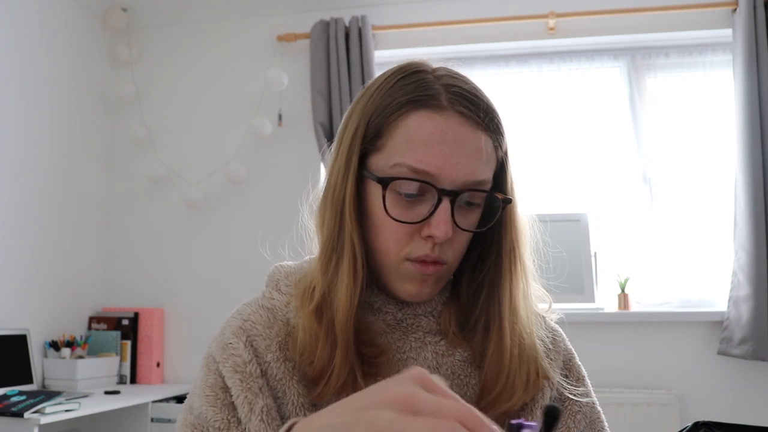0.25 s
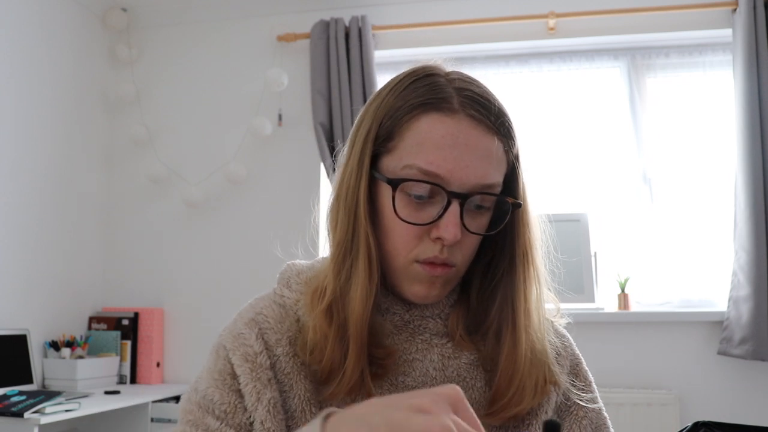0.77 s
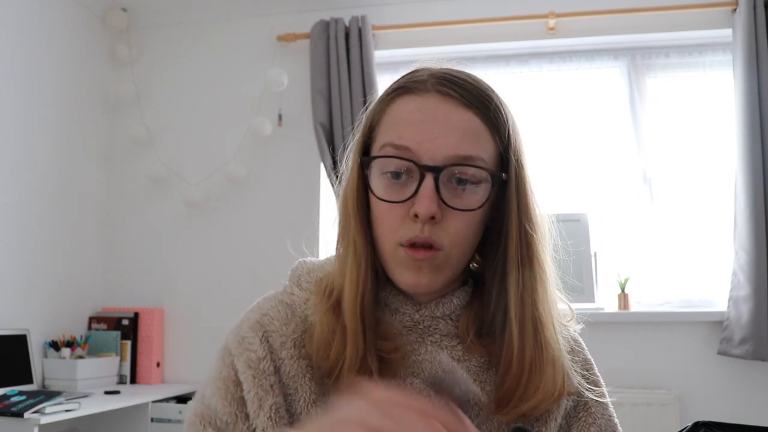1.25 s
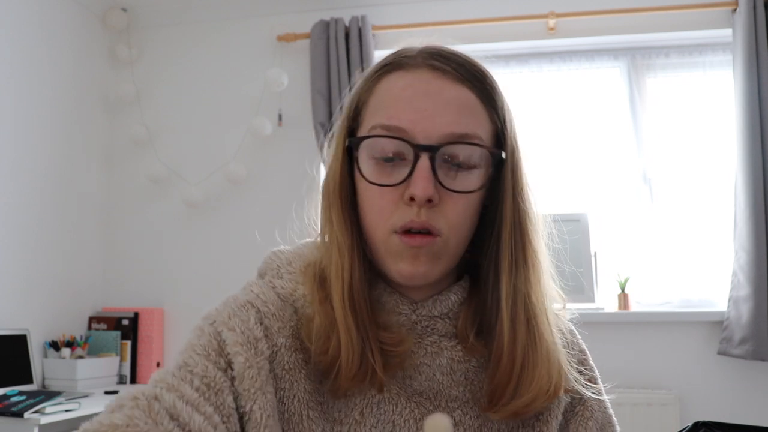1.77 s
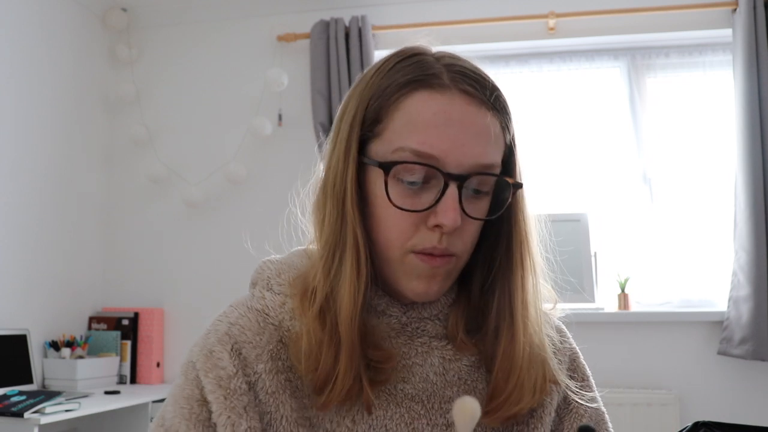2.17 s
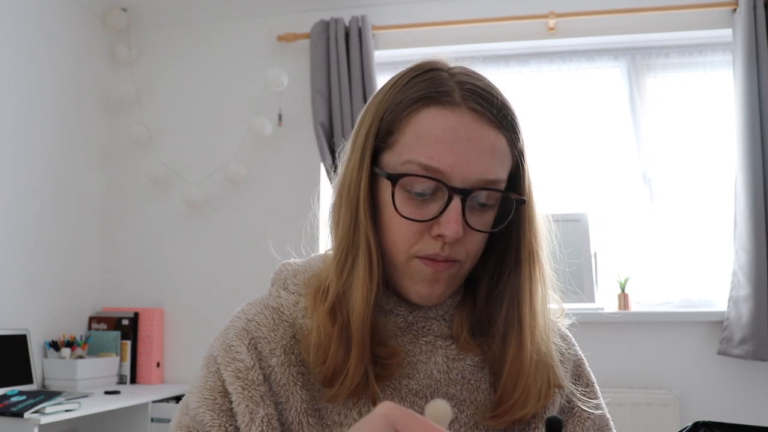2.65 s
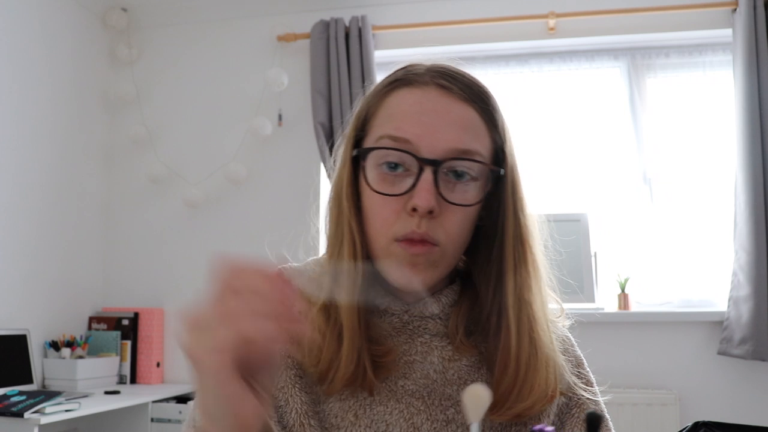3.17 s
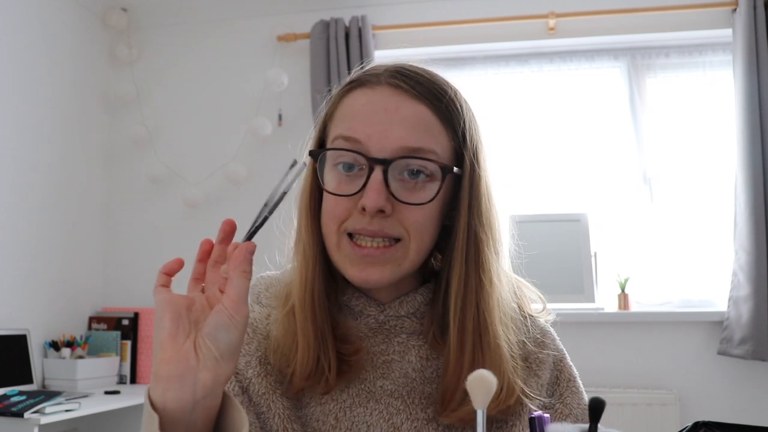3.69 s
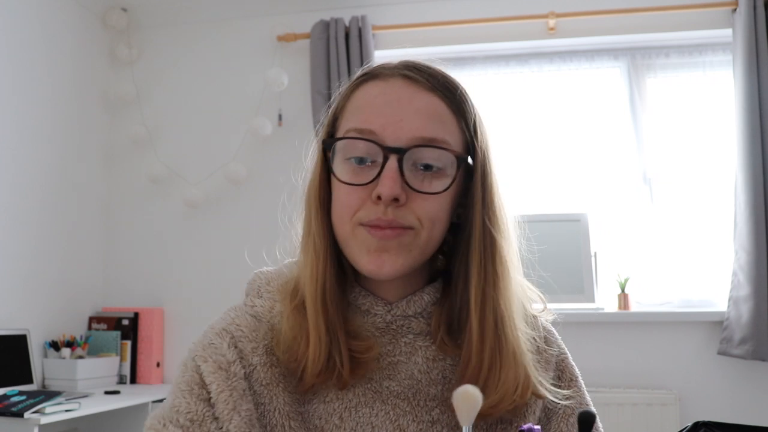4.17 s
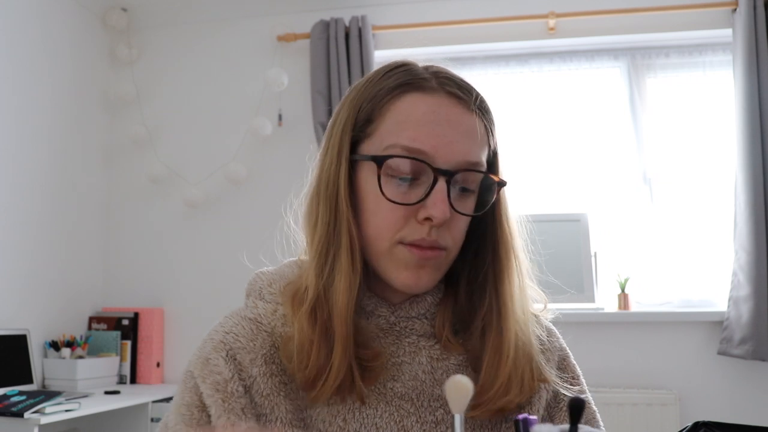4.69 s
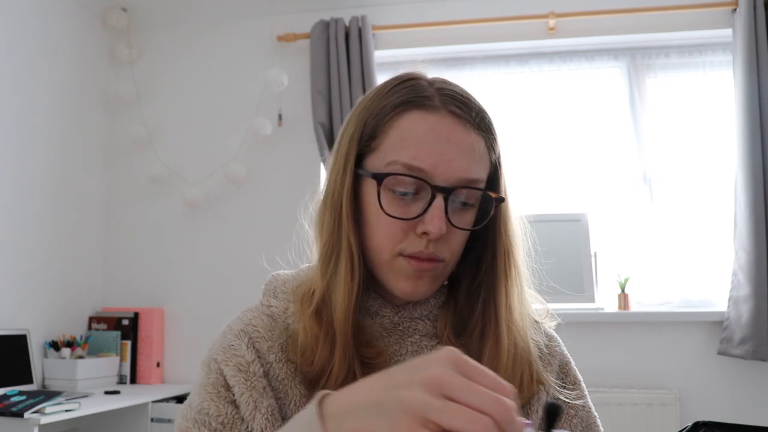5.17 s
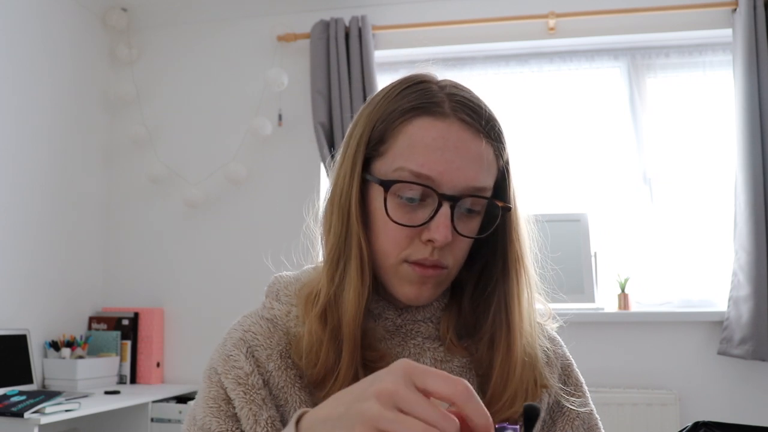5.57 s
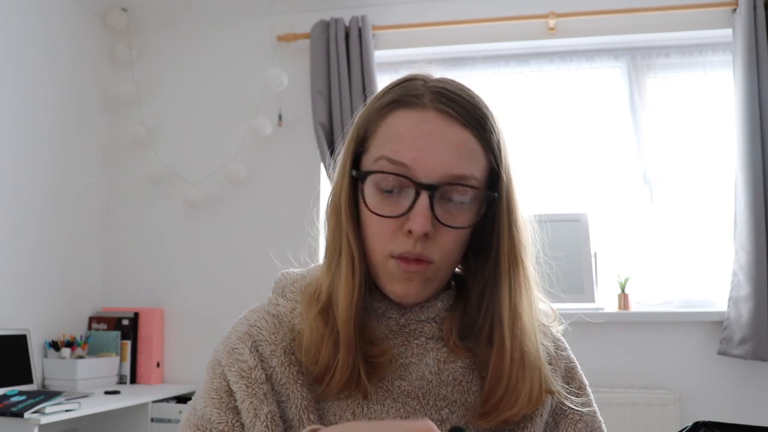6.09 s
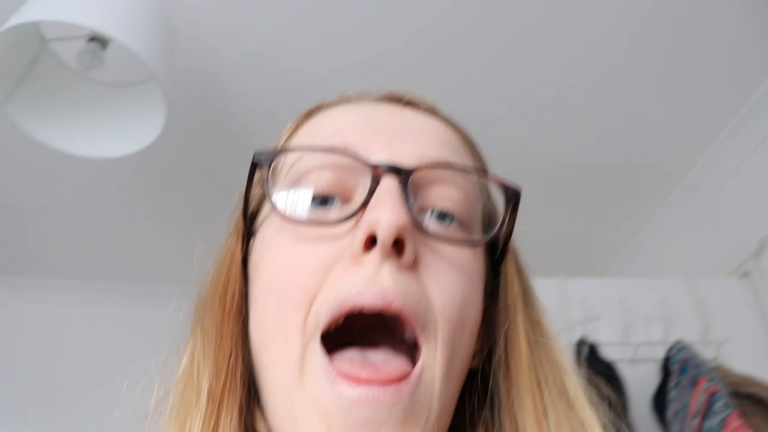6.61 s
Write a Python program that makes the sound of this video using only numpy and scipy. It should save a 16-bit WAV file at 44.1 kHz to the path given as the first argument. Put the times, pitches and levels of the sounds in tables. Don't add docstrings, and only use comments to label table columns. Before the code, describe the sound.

A quiet bedroom with short soft echo and steady low hiss, heard by a stereo camera microphone close to the objects. From 0 to 1.1 s fingers search a pot of small plastic and glass tubes: irregular bright clicks, hollow knocks and light rubbing, strongest near 0.26 and 0.5 s. At 1.2 s a tube falls in, lands hard and bounces in a rapid fading rattle until 1.5 s. From 1.84 to 2.5 s tubes drop on the desk at left with sharp cracks, woody knocks and scraping. From 2.6 to 3.2 s sparse clicks and a faint rim drag; at 3.3-3.6 s tiny creaks and taps close by. At 4.42 s steel tweezers strike the left desk, skid, chatter and ring thinly to about 5 s. Searching resumes at 5.2 s, busiest from 6.0 to 6.45 s. At 6.65 s a finger thumps the camera, then skin brushes it.

```python
import sys
import numpy as np
from scipy import signal
from scipy.fft import rfft, irfft, next_fast_len
from scipy.io import wavfile
from scipy.ndimage import map_coordinates

SR = 44100
rng = np.random.default_rng(int(sys.argv[2]) if len(sys.argv) > 2 else 0)


def elevation(decibels):
    levels = np.asarray(decibels, float)
    return 10 ** (levels / 20)


def store_wav(level_fs):
    pcm = np.round(np.clip(np.atleast_2d(level_fs), -1, 1) * 32767)
    wavfile.write(sys.argv[1], SR, pcm.T.astype(np.int16))


N = 302085
LENGTH = 4096
SIDES = np.array([[.5], [-.5]])  # left, right share of a pan in dB

# centre_hz, width_hz, level_db
TUBES = [(1970, 310, -1), (2930, 150, -28.5), (3520, 92, 4), (5210, 73, 5.5), (5520, 390, 6),
         (7250, 83, -11)]
# centre_hz, width_hz, level_db
POT = [(470, 106, 5), (599, 22, 16.5), (845, 217, 3.5), (1026, 96, 14.5), (1140, 14, -22.5)]
# centre_hz, width_hz, level_db
DESK = [(148, 21, -0.5), (195, 7, 10.5), (274.7, 25, 7), (346, 24, 1.5), (600, 35, -4), (760, 82, 3),
        (1241, 50, 5)]


def unit(x):
    return x / np.sqrt(np.mean(x ** 2) + 1e-20)


def along(points, hz):
    f, v = np.transpose(points)
    return np.interp(np.log(hz + 1), np.log(f + 1), v)


def filtered(x, response):
    m = next_fast_len(N + 8192)
    return irfft(rfft(x, m) * response(np.fft.rfftfreq(m, 1 / SR)), m)[..., :N]


def mode(f, hz, width):
    return 1j * f * width / (hz * hz - f * f + 1j * f * width)


def body(f, peaks):
    return sum((-1) ** k * elevation(db) * mode(f, hz, abs(w) + 5) for k, (hz, w, db) in enumerate(peaks))


def contacts(rows, hollow, broad, crack_s, sharpness, bright_db, shell=TUBES, rise_s=0.0021, punch=2.52):
    s, db, knock_db, edge_db, hz, knock_hz = np.transpose(rows)[:, :, None]
    t, f = np.arange(LENGTH) / SR, np.fft.rfftfreq(LENGTH, 1 / SR)
    shape = (len(s), LENGTH)
    crack = rng.standard_normal(shape) * elevation(-60 * t / min(crack_s, .016)) * (1 - np.exp(-t / rise_s))
    push = rfft(crack) + punch * np.exp(-2j * np.pi * f * 0.0006)
    snap = rfft(rng.standard_normal(shape) * elevation(-60 * t / 0.0071))
    clean_push = push + 22 * np.exp(-2j * np.pi * f * 0.00044)

    ring = mode(f, hz, hz / np.clip(sharpness, 2, 9))
    walls = broad + 0.5 * body(f, shell) + 1.5 * ring
    walls = walls * mode(f, 4000, 11900) ** 2 / (1 + 1j * f / 8000) ** 2
    knock = 0.42 * body(f, hollow) + mode(f, knock_hz, knock_hz / 3.2)
    knock = knock * mode(f, knock_hz, 1.4 * knock_hz)
    edge = mode(f, 8300, 5000) ** 2 * mode(f, 8000, 7000)

    parts = [irfft(p) for p in (push * walls, clean_push * knock, snap * edge)]
    gains_db = (db, db + knock_db + 3.5, db + edge_db + bright_db)
    sound = sum(elevation(g) * p / abs(p).max(axis=1, keepdims=True) for g, p in zip(gains_db, parts))
    buses = np.zeros((4, N + LENGTH))
    for k, row in enumerate(sound):
        buses[k % 4, round(s[k, 0] * SR):][:LENGTH] += row
    return buses[:, :N]


def clicks(rows, knock_db, knock_hz):
    return [(s, db, knock_db, edge_db, hz, knock_hz) for s, db, edge_db, hz in rows]


def knocks(rows, edge_db, ring_hz):
    return [(s, db, knock_db, edge_db, ring_hz, hz) for s, db, knock_db, hz in rows]


def rings(rows):
    rise_s = .001
    out, t = np.zeros(N + 2 * LENGTH), np.arange(2 * LENGTH) / SR
    for s, db, hz, t60 in rows:
        tone = np.sin(2 * np.pi * hz * t) * (1 - np.exp(-t / rise_s))
        out[round(s * SR):][:len(t)] += elevation(db - 60 * t / t60) * tone
    return out[:N]


def picking():
    # start_s, peak_db, edge_db, ring_hz
    tube_clicks = [(0.03, -16.5, -37.5, 2370), (0.175, -12, -10.5, 3360), (0.1835, -16, -15, 5100),
                   (0.2313, -15.5, -12.5, 3640), (0.2584, -5, -22.5, 3700), (0.2837, -8, -13.5, 3760),
                   (0.3342, -10.5, -15.5, 4160), (0.4274, -24, -14.5, 3600), (0.436, -29, -18, 2700),
                   (0.4444, -16, -11, 3630), (0.5102, -1, -27, 5550), (0.5543, -17.5, -13, 3300),
                   (0.6064, -30, -27, 1920), (0.7821, -32, -25, 5600), (0.9418, -19.5, -39, 5550),
                   (0.9664, -20, -37, 3540), (0.9826, -39, 7.5, 3500), (0.9945, -33.5, -0.5, 3520),
                   (1.0054, -13, -41, 5300), (1.1273, -21, -14.5, 6940),
                   (2.6166, -13, -6, 3740),
        (2.633, -5.5, -44, 4900),
        (2.6351, -15, -45.5, 3660),
        (2.6575, -11, -21.5, 4900),
        (2.9942, -20, -20.5, 3400),
        (3.1414, -11, -11, 3480),
        (4.164, -35.5, -41, 2900),
                   (5.246, -36.5, -12, 4300), (5.2969, -18, -8.5, 3720), (5.301, -10, -49.5, 3640),
                   (5.332, -18, -6, 3400), (5.731, -39.5, -26, 3430), (5.8036, -37.5, -27.5, 3570),
                   (6.002, -17, -25.5, 4500), (6.0504, -1, -13.5, 4100), (6.1564, -28.5, -10, 3300),
                   (6.2031, -18, -26.5, 4060), (6.25, -19, -31.5, 3760), (6.2842, -16.5, -23, 3520),
                   (6.253, -16.5, -28, 5640), (6.292, -21, -23.5, 4240), (6.322, -16.5, -23, 3670),
                   (6.3298, -5.5, -13, 4620), (6.3381, -11.5, -57.5, 4330), (6.4407, -19.5, -14.5, 3380)]
    # start_s, peak_db, knock_db, knock_hz
    pot_knocks = [(0.0024, -45, 17.5, 875), (0.0114, -8.5, -13, 850), (0.155, -23.5, -19.5, 660),
                  (0.4783, -24.5, -22, 500), (0.63, -26.5, -13, 1630), (0.6756, -21, -6.5, 1050),
                  (0.6886, -48.5, 21.5, 1130), (0.7094, -27.5, -3.5, 1110), (0.7467, -34, -15, 625),
                  (0.8843, -15, -20, 414), (0.895, -23, -29, 680), (1.0164, -22, -19, 1070),
                  (1.0434, -30.5, 1, 960), (1.0776, -16, -16.5, 570),
                  (2.566, -38.5, -11, 505), (2.7622, -24, -39, 457), (2.811, -22, -44, 476),
                   (2.863, -24, -20, 463), (3.1464, -11, -34, 700), (3.76, -50.5, 8, 1200),
                   (3.7755, -42.5, 6.5, 1790), (4.125, -62.5, 7, 219), (4.14, -61, 6, 350),
                   (4.152, -48, -2, 1300), (4.3277, -36.5, -12, 557), (5.1607, -38, -15, 1120),
                   (5.2678, -35, -5, 1120), (5.456, -30, -16, 466), (5.503, -31, -11, 1620),
                   (5.5244, -41.5, 4, 685), (5.539, -23, -24, 1096), (5.861, -39.5, -9.5, 470),
                   (5.9235, -34, -11, 880), (5.9668, -22.5, -23, 960), (5.976, -28, -8, 1210),
                   (6.0092, -29, -12, 1450)]
    picked = clicks(tube_clicks, knock_db=-29.0, knock_hz=600)
    picked += knocks(pot_knocks, edge_db=-22.5, ring_hz=3300)
    return contacts(sorted(picked), POT, broad=0.94, crack_s=0.017, sharpness=2.76, bright_db=15, punch=1.58)


def bounces(count):
    first_s, flight_s, shrink = 1.3154, .0205, .77
    first_db, loss_db, knock_db, knock_hz = -12.5, 3, -8.5, 850
    rows = []
    for k in range(count):
        at_s = first_s + flight_s * (1 - shrink ** k) / (1 - shrink)
        rows.append((at_s, first_db - loss_db * k, knock_db, knock_hz))
    return rows


def falling():
    # start_s, peak_db, knock_db, knock_hz
    fall = [
        (1.2225, -15.5, -2, 780),
        (1.228, -16, -6, 650),
        (1.2485, -20, -4.5, 900),
        (1.279, -10, -22, 900),
        (1.2364, -21, 1, 900),
        (1.252, -6.5, -15, 860),
        (1.2832, -2.5, -15, 834),
        (1.4631, -40, -8, 1190),
        (1.5194, -33, -15, 526),
        (1.7694, -41, -4.5, 446),
    ]
    rows = knocks(fall + bounces(count=8), edge_db=-22, ring_hz=3400)
    return contacts(rows, POT, broad=0.6, crack_s=0.021, sharpness=8.1, bright_db=-40.0)


def pot_rings():
    # start_s, level_db, pitch_hz, t60_s
    clear_modes = [(1.2235, -16.5, 592, 0.08), (1.2235, -24, 960, .05), (1.2235, -14, 2140, 0.022),
                   (1.2235, -13, 3400, 0.028), (1.2505, -17, 3300, 0.035), (1.2505, -22, 1600, .04),
                   (1.283, -14.5, 1482, 0.041), (1.283, -27, 3520, 0.028), (1.316, -22, 1600, 0.049),
                   (5.925, -52, 980, .03), (5.953, -33, 950, 0.023), (5.976, -24, 967, 0.028),
                   (5.976, -28, 1550, 0.039), (5.991, -35, 1480, .06), (6.005, -25, 973, 0.042),
                   (6.013, -27, 3400, .02), (6.019, -39, 1090, .05), (6.441, -34.5, 957, 0.037),
                   (.2595, -15, 4900, .03), (.284, -28, 3520, 0.045), (.287, -17, 4900, 0.037),
                  (.3345, -18, 3530, 0.039), (.34, -34.5, 2110, 0.11), (.4455, -17, 3400, 0.025),
                  (.511, -14, 5550, 0.018), (.512, -12, 3800, .02), (1.842, -21.5, 3600, .06),
                  (1.8675, -28.5, 2800, 0.18), (4.11, -50, 201, .2), (2.6157, -9, 3590, 0.037),
                  (2.6335, -11, 3490, .03), (2.6335, -9.5, 4780, 0.019), (2.657, -26, 5030, 0.031),
                  (2.995, -19.5, 3320, 0.017), (3.1417, -16, 3480, 0.033), (6.051, -27, 3846, 0.025)]
    return rings(clear_modes)


def hums():
    # start_s, end_s, level_db, pitch_hz, width_hz
    drags = [
        (2.69, 2.91, -46, 474, 32),
        (2.77, 2.93, -56, 931, 40),
    ]
    edge_s, sag_db = .015, 5
    t, out = np.arange(N) / SR, 0
    for start, end, db, hz, width_hz in drags:
        tone = unit(filtered(rng.standard_normal(N), lambda f: mode(f, hz, width_hz) ** 2))
        level = elevation(db - sag_db * (t - start) / (end - start))
        out = out + tone * level * np.clip(np.minimum(t - start, end - t) / edge_s, 0, 1)
    return out


def dropping():
    # start_s, peak_db, edge_db, ring_hz
    sharp = [(1.8418, -13, -20, 3560), (1.846, -19, -18, 3580), (1.8566, -12, -18, 3550),
             (1.8672, -9, -18, 3480), (1.879, -13, -20, 3600), (1.917, -11, -7, 5440),
             (1.922, 2.5, 14, 8450), (1.926, -3.5, 0, 8340), (1.9505, -19.5, -11, 4600),
             (2.084, -11.5, -4, 5200), (2.0915, -13.5, -10.5, 5200), (2.11, -27.5, -13, 5500),
             (2.4415, -2, 4, 7040)]
    # start_s, peak_db, knock_db, knock_hz
    dull = [(1.949, -12, -19, 600), (1.9727, 5.5, -17.5, 670), (2.0648, -5, -11, 606),
            (2.0725, -16, 1, 720), (1.926, -16, -7, 600), (1.959, -24.5, 7, 670), (2.123, -32.5, 3.5, 300),
            (2.0843, -19.5, -12, 310), (2.0914, -18, -29, 450), (2.1094, -33, 1, 620),
            (2.1594, -33.5, -11, 273), (2.2227, -34.5, 3.5, 530), (2.296, -46, 8, 560),
            (2.3305, -37.5, -0.5, 510), (2.4484, -29.5, 6.5, 670), (2.462, -22, -12, 1230)]
    # centre_hz, width_hz, level_db
    lying = [(2030, 420, -2.5), (3480, 180, -28.5), (4900, 170, 1), (5600, 660, -15), (8300, 500, 9)]
    rows = clicks(sharp, knock_db=-37, knock_hz=700) + knocks(dull, edge_db=2.5, ring_hz=4920)
    return contacts(sorted(rows), DESK, broad=0.62, crack_s=0.0087, sharpness=10, bright_db=-16.5,
                    shell=lying, rise_s=0.00055)


def tossing():
    # start_s, peak_db, edge_db, ring_hz
    blows = [
        (4.4227, -2.5, -22, 5680),
        (4.4625, 8.5, -17.5, 2230),
        (4.508, -10.5, 1, 3380),
        (4.5324, -2, -13, 6090),
        (4.6465, -1.5, -20, 3920),
    ]
    # start_s, peak_db, knock_db, knock_hz
    thuds = [(4.4245, -17.5, -1, 700), (4.4655, -24, 0, 600), (4.5155, -41, -2.5, 600),
             (4.5473, -41, 3, 1290), (4.569, -21, 3, 600), (4.6127, -45, 14, 810), (4.638, -39, 9, 600),
             (4.6977, -23, 1, 900), (4.7237, -31, 9.5, 1020), (4.7406, -25, 2, 600),
             (4.7674, -24.5, 6, 760), (4.777, -38.5, 12.5, 600), (4.7895, -26.5, 3, 1270)]
    # start_s, peak_db, ring_hz
    chatter = [(4.4418, -12.5, 6000), (4.4964, -20.5, 5500), (4.5151, -10.5, 2480), (4.5455, -16.5, 4500),
               (4.5645, -14, 4300), (4.5685, -9.5, 5460), (4.5715, -3.5, 3800), (4.5975, -18.5, 4200),
               (4.612, -23, 5000), (4.6175, -9, 3860), (4.627, -19.5, 5050), (4.6394, -21.5, 2340),
               (4.654, -17, 5200), (4.6677, -5.5, 4000), (4.6722, -6.5, 4400), (4.68, -16.5, 5200),
               (4.6985, -16, 2300), (4.724, -23, 5000), (4.741, -17.5, 4520), (4.752, -22, 2300),
               (4.761, -29.5, 5000), (4.768, -30.5, 4430), (4.79, -36, 3800)]
    # centre_hz, width_hz, level_db
    arms = [(1620, 140, 4.5), (2240, 850, 5.5), (3860, 300, 1), (5550, 900, -4.5), (6760, 690, -1)]
    top_hz = 8000
    dull = clicks([(s, db, -60, hz) for s, db, hz in chatter], knock_db=-19.5, knock_hz=560)
    dull += knocks(thuds, edge_db=-64.5, ring_hz=2136)
    hard = contacts(clicks(blows, knock_db=-17, knock_hz=500), DESK, broad=0.5, crack_s=0.0085, sharpness=5,
                    bright_db=0, shell=arms, rise_s=.0003)
    clatter = contacts(sorted(dull), DESK, broad=0.17, crack_s=0.0065, sharpness=2.8, bright_db=-0.5,
                       shell=arms, rise_s=0.00045)
    return hard, filtered(clatter, lambda f: 1 / (1 + 1j * 1.4 * f / top_hz - (f / top_hz) ** 2))


def desk_rings():
    # start_s, level_db, pitch_hz, t60_s
    modes = [(1.922, -4, 8400, .03), (1.9727, -23.5, 318, 0.08), (2.0648, -26.5, 310, 0.091),
             (2.09, -31, 318, 0.062), (4.486, -28, 8360, 0.28), (4.571, -3, 1610, 0.017),
             (4.618, -15, 3860, 0.017), (4.619, -15.5, 1615, .04), (4.6465, -8.5, 1620, 0.029),
             (4.6465, -4.5, 3860, .02), (4.6677, -16, 3860, .015), (4.673, -16, 1620, .04),
             (4.698, -30, 3800, .12), (4.79, -28, 3800, 0.045)]
    return rings(modes)


def tweezers():
    # pitch_hz, level_db, t60_s
    steel = [(3763, -5, .2), (6633, -6, 1.2), (7575, -14, .4), (8360, -2, .6), (8452, -1, .7),
             (10105, -6, .8), (12012, -3, 1.1), (12900, -4, .55), (14150, -7, .18)]
    # start_s, level_db
    blows = [
        (4.423, -42),
        (4.487, -38),
        (4.533, -41),
        (4.647, -39),
    ]
    flat_s = 4.8
    out, t = np.zeros(N + SR), np.arange(SR // 2) / SR
    for s, db in blows:
        luck = rng.standard_normal((len(steel), 2))
        lying_s = np.clip(t + s - flat_s, 0, None)
        for (hz, level, t60), (a, b) in zip(steel, luck):
            fall_db = 60 * t / t60 + lying_s * 300 * (hz / 10000) ** 2
            tone = np.sin(2 * np.pi * hz * t + b) * (1 - np.exp(-t / .002))
            out[round(s * SR):][:len(t)] += elevation(db + level + 1.5 * a - fall_db) * tone
    return out[:N]


def bends():
    # start_s, level_db, pitch_hz, t60_s
    modes = [
        (4.45, -34, 2240, .03),
        (4.4635, -3, 2240, 0.02),
        (4.489, -28, 2240, .03),
        (4.516, -22, 2290, .03),
        (4.534, -16, 2240, .02),
        (4.598, -22, 2240, 0.044),
        (4.636, -26, 2240, .025),
    ]
    return rings(modes) * elevation(5 * SIDES)


def close_contacts():
    # start_s, peak_db, edge_db, ring_hz
    near_clicks = [
        (3.362, -14, -23, 3640),
        (3.3994, -33, -34, 4900),
        (3.4302, -34, -26, 1580),
        (3.4835, -43, -20, 4250),
        (3.6153, -23.5, -23, 4910),
        (6.6453, -23, -20, 7700),
    ]
    # start_s, peak_db, knock_db, knock_hz
    thump = [
        (6.648, -31, -1.5, 600),
    ]
    rows = clicks(near_clicks, knock_db=-24.5, knock_hz=434) + knocks(thump, edge_db=-32, ring_hz=1600)
    return contacts(rows, POT, broad=1.0, crack_s=0.038, sharpness=22, bright_db=25.5)


def ticks():
    # start_s, peak_db, ring_hz
    creaks = [(3.263, -50.5, 10500), (3.324, -39.5, 8800), (3.351, -47, 10500), (3.388, -36, 3550),
              (3.421, -46.5, 8000), (3.432, -39, 12000), (3.465, -51.5, 4000), (3.4695, -51, 6650),
              (3.487, -37, 10200), (3.555, -54, 7000), (3.566, -51.5, 6000)]
    sharpness = 6
    out, t = np.zeros(N + LENGTH), np.arange(LENGTH // 8) / SR
    for s, db, hz in creaks:
        decay = np.exp(-np.pi * hz / sharpness * t)
        out[round(s * SR):][:len(t)] += elevation(db + 13.5) * np.sin(2 * np.pi * hz * t) * decay
    return out[:N]


def grains(per_s, spread_db, smooth):
    size = elevation(spread_db * np.minimum(rng.exponential(size=N), 4))
    slips = (rng.random(N) < per_s / SR) * rng.standard_normal(N) * size
    return unit(slips) + smooth * rng.standard_normal(N)


def strokes():
    # strongest_s, rise_s, fall_s, scrape_db, rumble_db
    moves = [(0.01, 0.12, 0.0097, -25, -53), (0.452, 0.026, 0.06, -33, -43), (0.6, 0.22, 0.11, -40, -49.5),
             (1.042, 0.21, 0.028, -32, -47.5), (1.242, 0.014, 0.083, -29, -37),
             (1.299, 0.027, 0.056, -30, -36.5), (1.872, 0.034, 0.045, -19.5, -35),
             (1.961, 0.035, 0.12, -20.5, -28), (2.099, 0.034, 0.017, -17.5, -25.5),
             (2.2, 0.026, 0.3, -50, -48.5), (2.73, 0.27, 0.39, -68, -50), (4.43, 0.012, .08, -19, -39),
             (4.758, 0.082, .05, -25.5, -28), (2.83, 0.18, 0.069, -35, -59),
             (3.106, 0.068, 0.032, -24.5, -52.5), (3.15, 0.026, 0.065, -33, -72),
             (3.769, 0.046, 0.069, -56, -54), (5.29, 0.022, 0.0039, -31.5, -41.5),
             (5.336, 0.019, 0.032, -21, -37), (6.01, 0.044, 0.024, -33.5, -63),
             (6.256, 0.011, 0.041, -23, -43.5), (6.325, 0.009, 0.0087, -24, -42)]
    drop_db = 20
    skid_start_s, skid_end_s, skid_stop_s = 4.464, 4.795, 0.023
    skid_db, skid_rumble_db, skid_sag_db = -15.5, -34.5, 12
    at, rise, fall, *levels = np.transpose(moves)[:, :, None]
    t = np.arange(0, N, 16) / SR
    away = np.maximum((at - t) / abs(rise), (t - at) / abs(fall))
    fade_db = drop_db * away * (1 + (away > 1.5) * 4)
    share = (t - skid_start_s) / (skid_end_s - skid_start_s)
    stop_db = drop_db * np.clip(t - skid_end_s, 0, None) / skid_stop_s
    skids = (skid_db - skid_sag_db * share - stop_db, skid_rumble_db - stop_db)
    gains = []
    for db, skid in zip(levels, skids):
        gain = elevation(db - fade_db).sum(axis=0) + elevation(skid) * (share > 0)
        gains.append(np.interp(np.arange(N) / SR, t, gain))
    return gains


def rubbing():
    # freq_hz, level_db
    scrape_tone = [(590, -21), (1000, -27), (1480, -10), (1890, -5.5), (3420, 0), (6330, -7.5), (9830, -9),
                   (16000, -20.5)]
    # freq_hz, level_db
    slide_tone = [(130, -58.5), (350, -10.5), (700, -10.5), (2400, 2), (4500, -17.5), (7500, -16),
                  (9000, -38), (16000, -70.5)]
    # centre_hz, width_hz, level_db
    slide_body = [(570, 54, -3.5), (1295, 54, 8), (1620, 84, -6.5), (2230, 100, 14.5), (3800, 82, 1)]
    pot_body = [(483, 73, 2.0), (960, 77, -1.5)]
    slips, shake = grains(3500, 2.6, smooth=0.13), grains(500, 3.3, smooth=0.36)
    dull_slips = grains(1200, 2.7, smooth=0.15)
    tubes = unit(filtered(slips, lambda f: elevation(along(scrape_tone, f)) * (7.1 + body(f, TUBES))))
    slide = unit(filtered(dull_slips, lambda f: elevation(along(slide_tone, f)) * (3.6 + body(f, slide_body))))
    pot = unit(filtered(shake, lambda f: body(f, pot_body) * mode(f, 380, 2000)))
    desk = unit(filtered(shake, lambda f: body(f, DESK) * mode(f, 380, 2000)))
    scrape, rumble = elevation([[-4.5], [-2]]) * strokes()
    t = np.arange(N) / SR
    left = ((t > 1.91) & (t < 2.55)) | ((t > 4.38) & (t < 4.9))
    return (scrape * tubes + rumble * pot) * ~left, (scrape * slide + rumble * desk) * left


def brush():
    # start_s, length_s, skin_db, sheen_db
    slides = [
        (6.652, .065, -49, -48),
        (6.776, .02, -47.5, -74),
        (6.823, .05, -48.5, -81.5),
    ]
    # freq_hz, level_db
    skin_tone = [(180, -41), (300, -1), (372, -0.5), (2100, -4), (8640, -7), (16000, -23.5)]
    edge_s, pan_db, sheen_hz, sheen_width_hz = 0.016, -5, 10000, 6500
    t, out = np.arange(N) / SR, 0
    slips = np.array([grains(3000, 1.5, smooth=0.92) for _ in "LR"])
    skin = unit(filtered(slips, lambda f: elevation(along(skin_tone, f))))
    sheen = unit(filtered(slips, lambda f: mode(f, sheen_hz, sheen_width_hz) ** 3))
    for s, length, skin_db, sheen_db in slides:
        swell = np.clip(np.minimum(t - s, s + length - t) / edge_s + 1, 0, 1)
        out = out + swell * (elevation(skin_db) * skin + elevation(sheen_db) * sheen)
    return out * elevation(pan_db * SIDES)


def jolts():
    # start_s, level_db
    blows = [
        (0.512, -34),
        (1.285, -36),
        (1.973, -36.5),
        (4.466, -23),
        (6.6453, -23.5),
    ]
    out, u = np.zeros(N + LENGTH), np.arange(LENGTH) / SR / 0.00068
    for s, db in blows:
        out[round(s * SR):][:LENGTH] += elevation(db) * np.e * u * np.exp(-u)
    return filtered(out[:N], lambda f: mode(f, 130, 200) * mode(f, 120, 260)) * elevation(-5 * SIDES)


def heard(buses, lag, pan_db, scatter):
    from_hz, step_hz = 1400, 1334
    knots, out = rng.standard_normal((len(buses), 64)), 0
    for x, k in zip(buses, knots):
        def turn(f):
            wander = map_coordinates(k, [f / step_hz], mode="nearest")
            bend = scatter * wander * f / (f + from_hz)
            return np.exp(2j * SIDES * (bend - np.pi * f * lag / SR))
        out = out + filtered(x, turn)
    return elevation(pan_db * SIDES) * out


def room(buses):
    # freq_hz, t60_s
    decay = [(150, 0.24), (800, 0.29), (3000, 0.23), (8000, 0.2), (15000, 0.029)]
    hz, t, z = signal.stft(rng.standard_normal((len(buses), 2, SR // 3)), SR, nperseg=256)
    shared = np.clip(along([(200, 0.92), (900, 0.48), (2500, 0.21)], hz), 0, 1)[:, None]
    z[:, 1] = shared * z[:, 0] + np.sqrt(1 - shared ** 2) * z[:, 1]
    tail = signal.istft(z * elevation(-60 * t / along(decay, hz)[:, None]), SR, nperseg=256)[1]
    tail = np.pad(tail / np.linalg.norm(tail[0, 0]), ((0, 0), (0, 0), (130, 0)))
    return signal.fftconvolve(buses[:, None], tail, axes=2)[..., :N].sum(axis=0)


def hiss():
    # freq_hz, level_db
    tone = [(20, -41), (88, -23.5), (300, -27), (1050, -34), (2200, -36), (5560, -40.5), (10900, -44),
            (15600, -51), (16300, -77)]
    # freq_hz, correlation
    alike = [(60, 0.6), (240, 0.44), (950, 0.71), (3770, 0.93), (15000, 0.45)]

    def shape(f):
        turn = np.arccos(np.clip(along(alike, f), -1, 1)) / 2
        return elevation(along(tone, f)) * [np.cos(turn), np.sin(turn)]

    mid, side = filtered(rng.standard_normal((2, N)), shape)
    return elevation(np.array([[-57], [-55]])) * unit(np.array([mid + side, mid - side]))


def scene():
    front = picking() + falling()
    drop = dropping()
    hard, toss = tossing()
    close = close_contacts()
    rub_front, rub_left = rubbing()
    front[0] += rub_front
    front[1] += pot_rings() + hums()
    toss[0] += rub_left
    toss[1] += desk_rings()
    close[1] += ticks()
    near = heard(front + close, lag=2.1, pan_db=-3, scatter=.25)
    aside = heard(np.vstack([drop + toss + hard, tweezers()]), lag=-9, pan_db=1.8, scatter=.6)
    dulled = filtered(elevation(-11.5) * toss + elevation(-14) * hard, lambda f: 1 / (1 + 1j * f / 4500) ** 2)
    echo = room(elevation(-8) * front + elevation(-12.5) * close + elevation(-10.5) * drop + dulled)
    return near + aside + bends() + echo + jolts() + brush() + hiss()


def band_limit(x):
    return signal.sosfilt(signal.butter(12, 16440, fs=SR, output="sos"), x)


def record(dry):
    top_hz = 15850
    clipped = dry / (1 + abs(dry) ** 8) ** (1 / 8)
    return band_limit(filtered(clipped, lambda f: f < top_hz))


dry = scene()
out = record(dry)
store_wav(out)
```